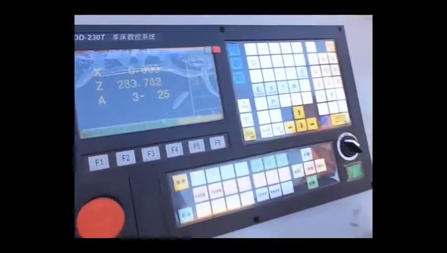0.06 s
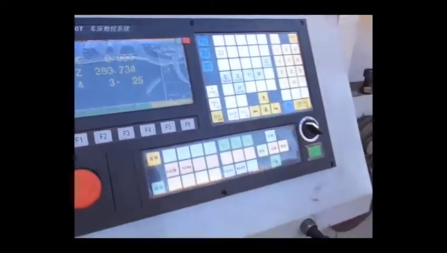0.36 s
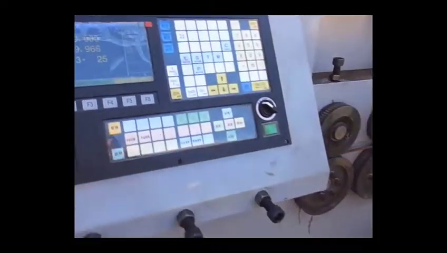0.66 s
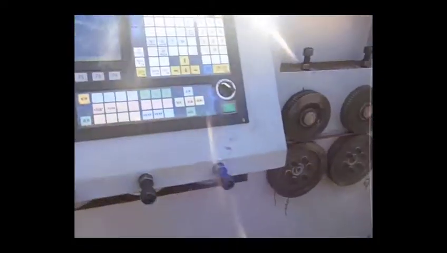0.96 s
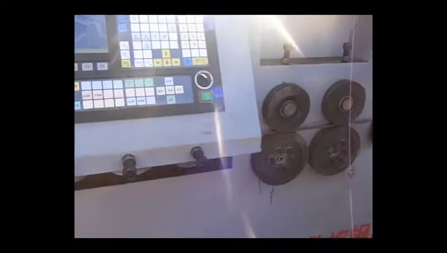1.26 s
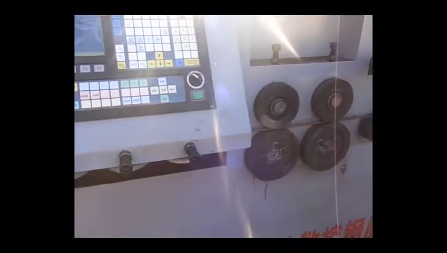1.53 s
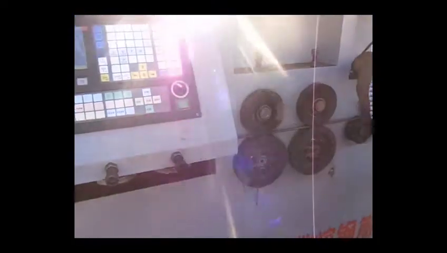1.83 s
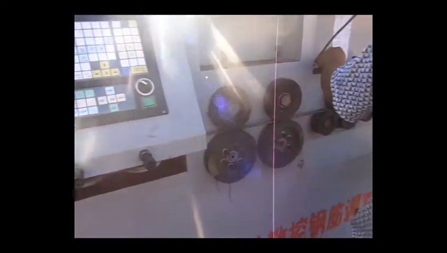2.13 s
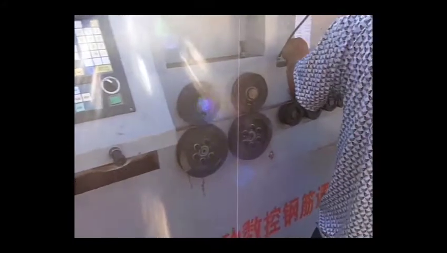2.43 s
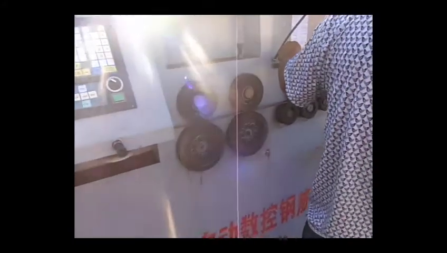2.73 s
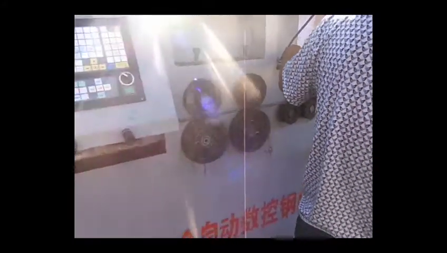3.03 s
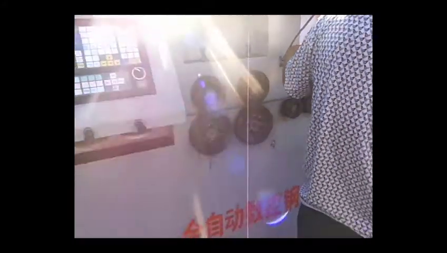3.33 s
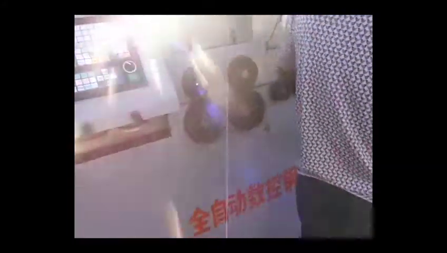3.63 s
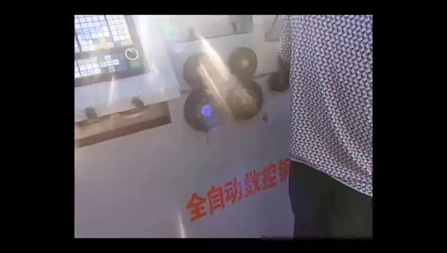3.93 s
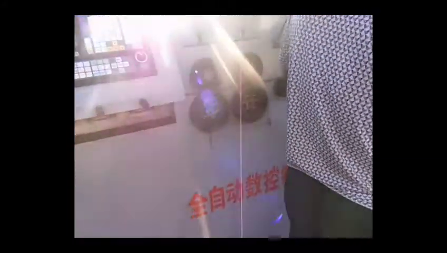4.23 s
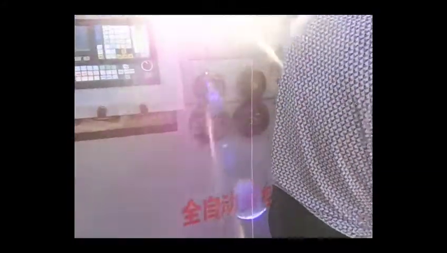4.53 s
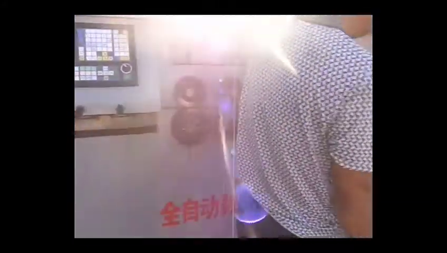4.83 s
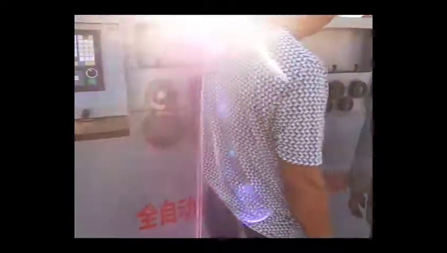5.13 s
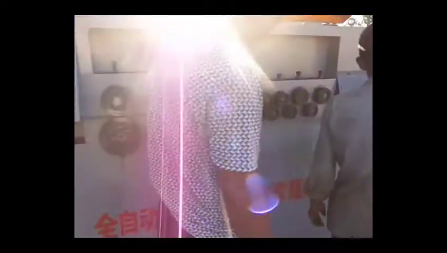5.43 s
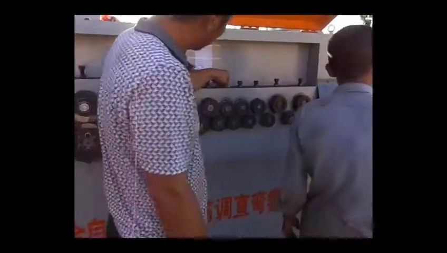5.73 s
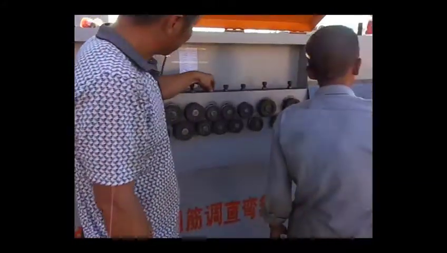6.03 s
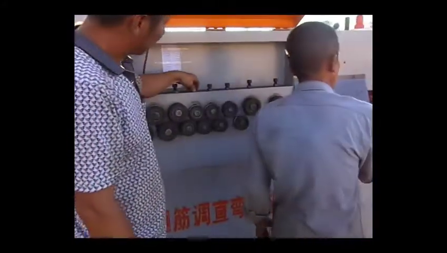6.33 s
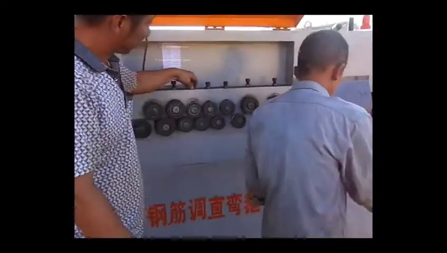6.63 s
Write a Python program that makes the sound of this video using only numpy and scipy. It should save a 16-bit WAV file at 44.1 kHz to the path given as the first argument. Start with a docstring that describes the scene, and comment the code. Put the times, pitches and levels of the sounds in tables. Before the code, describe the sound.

Close to the microphone, a machine feeds steel bar through rollers in five strokes, each with a low hum, cabinet rumble and scraping. The first strokes are heavier, with dull knocks and light ticks. Then loose steel takes over, clanging, pinging and rattling in quick irregular clusters. Near the end the bar briefly groans in the rollers and rings out. A soft outdoor wash lies underneath.

```python
"""You hear loose steel clanking and chattering over five surges of humming, rumbling and scraping.
It is a rebar straightening and bending machine, close by in an open yard. In each stroke the rollers
pull the bar: the drive hums, the cabinet rumbles and the ribbed steel scrapes through, snagging now
and then. The bar hits its steel guides so loudly that a limiter turns the peaks down."""
import sys
import numpy as np
from scipy import signal
from scipy.fft import rfft, irfft, next_fast_len
from scipy.io import wavfile
from scipy.ndimage import uniform_filter1d, minimum_filter1d, map_coordinates

SR = 44100
rng = np.random.default_rng(int(sys.argv[2]) if len(sys.argv) > 2 else 0)


def persist_wave(psi):
    """Save psi, clipped to +-1, as 16-bit WAV."""
    counts = np.round(np.clip(psi, -1, 1) * 32767).astype(np.int16)
    wavfile.write(sys.argv[1], SR, np.atleast_2d(counts).T)


N = 294588

# Tone colours. Each row: frequency in Hz, relative level in dB.
YARD_TONE = [(15, -69), (25, -43), (69, -19), (109, -18), (158, -15.5), (191, -10), (404, -9.5), (501, -13),
             (903, -32), (1030, -21.5), (1860, -19.5), (15000, -53)]
RUMBLE_TONE = [(25, -19.5), (60, -21), (110, -17), (170, -2), (260, -6.5), (380, 0.5), (480, -5.5),
               (700, -10), (1500, -65)]
ROLLING_TONE = [(250, -45), (420, -16), (520, -2), (740, 5.5), (980, 1), (1150, -1), (1600, -12),
                (2000, -7), (3000, -20), (8000, -31.5)]
CHATTER_TONE = [(940, -26.5), (1600, -10.5), (2790, -4), (3010, -0.5), (4190, 3.5), (4560, 0.5),
                (5320, 2.5), (6590, -11.5), (7500, -8), (9750, -15.5), (16500, -120)]
SCRAPE_TONE = [(1000, -123), (4000, -31), (6500, -6.5), (7600, -5), (8800, -3.5), (10500, 2), (13000, 6),
               (14500, 0.5), (16000, -37)]
BODY_TONE = [(60, -59), (250, -21), (600, -15), (1150, -8.5), (1700, 0), (2100, -3), (2600, -0.5),
             (4000, -27.5)]  # the low part of a blow
CLANG_TONE = [(1350, -42), (2300, -31), (3230, 8.5), (3730, -6.5), (4220, 9.5), (4840, 0), (5280, 4.5),
              (7200, -8), (9360, -24.5), (15800, -120)]  # its middle
EDGE_TONE = [(1000, -100), (5000, -54), (7000, -1.5), (7700, 0), (8800, -3), (9800, -0.5), (13000, 6),
             (14700, 2.5), (16000, -39)]  # its bright top
ECHO_TONE = [(100, -29.5), (1000, -32), (10000, -26.5)]
# Resonances, the pitches a part favours. Each row: pitch in Hz, width in Hz, relative level in dB.
HOUSING_MODES = [(410, 64, -2), (651, 86, -7.5), (1137, 12, -0.5), (1341, 24, 3), (1556, 180, -1.5),
                 (3650, 70, 7.5)]
BINDING_MODES = [(755, 36, -12.5), (1060, 59, -8), (1207, 15, -2)]
DIE_MODES = [(1600, 260, 11.5), (2345, 78, 21.5), (2860, 590, 17), (3840, 110, 8)]
FRAME_MODES = [(3980, 75, -5), (4880, 24, 2.5), (5460, 17, -17.5), (6010, 43, 1), (6360, 62, -11),
               (5920, 28, -3), (7180, 58, -24), (8640, 60, 1), (9200, 65, -1), (9740, 20, -10),
               (10450, 23, 5), (11770, 58, -7), (11600, 110, 1), (12100, 66, -22), (13300, 69, -37)]
# Ringing notes of the bar and guides. Each row: pitch in Hz, relative level in dB.
STEEL_MODES = [(2519, -28.5), (2869, -77), (3284, -43.5), (3569, -24), (3693, -31.5), (3919, -27),
               (4113, -44.5), (4608, -35), (4791, -42), (5146, -46), (5688, -40), (6089, -41), (6266, -44),
               (7407, -46), (7639, -66), (8118, -38), (8737, -23), (9211, -26), (9738, -27), (10212, -22.5),
               (10933, -27), (11644, -37), (12053, -57), (12425, -43), (13334, -42.5), (14260, -36)]
# The steel's short crash. Each row: frequency in Hz, seconds to fade by 60 dB (called t60).
STEEL_FADE = [(500, .12), (2000, .13), (5000, .115), (9000, .1), (15000, .09)]
# The drive speeds up a little, then slows. Each row: time in seconds, pitch in Hz.
DRIVE_PITCH = [(0.0, 77.5), (1.6, 79.2), (4.4, 77.24), (6.68, 75.5)]
# The tones in the hum. Each row: multiple of the drive's pitch, relative level in dB.
HUM_HARMONICS = [(1, -1), (2, -9), (3, -4.5), (4, -12), (5, -18.5), (8, -15), (10, -16), (12, -34.5)]
# The rollers pull. Each row: start and stop in seconds, then hum, rumble, rolling, rasp, chatter
# and scrape in dB.
FEED_STROKES = [(-0.2, 0.4, -46, -30, -31, -50, -45.5, -43),
                (1.27, 1.837, -34.5, -35.5, -31.5, -44, -53, -41.5),
                (2.723, 3.39, -45.5, -44, -37.5, -49, -61.5, -48),
                (4.159, 4.802, -49, -47, -36, -41.5, -28.5, -47),
                (6, 6.517, -48, -44, -40.5, -56, -48.5, -34)]
# The bar catches, then lets go. Each row: time in seconds, then hum, rumble, rolling and rasp in dB.
BAR_SNAGS = [(0.225, -27, -24, -17.5, -19.5), (1.42, -31.5, -49, -37, -57), (1.79, -26.5, -36, -56, -61),
             (3.09, -50, -42, -56, -37), (3.2, -57, -47, -36, -31.5), (4.33, -40.5, -60, -50, -29.5),
             (4.502, -61, -55, -40, -73), (6.09, -37.5, -32.5, -27, -42), (6.173, -60, -24.5, -23.5, -41),
             (6.47, -42.5, -51, -37.5, -54)]
# The bar rattles. Each row: start and stop in seconds, then rolling, rasp, chatter and scrape in dB.
BAR_RATTLES = [(2.086, 2.115, -53, -57, -48.5, -56), (2.877, 2.93, -48, -52, -46, -50),
               (3.228, 3.422, -67, -42.5, -60, -46.5), (3.66, 3.794, -47, -35.5, -29, -38),
               (3.873, 4.117, -53, -56, -37.5, -57), (4.277, 4.375, -65, -50, -22.5, -37),
               (4.925, 5.105, -53, -43, -38.5, -53), (5.134, 5.572, -43, -28.5, -24, -30),
               (5.356, 5.428, -68, -32, -13.5, -20.5), (5.903, 6.158, -30.5, -32, -38, -28.5),
               (6.567, 6.665, -46, -57, -39, -26.5)]
# The bar binds in the rollers. Each row: start and stop in seconds, level in dB.
BAR_GROANS = [(6.114, 6.19, -19.5), (6.318, 6.356, -29.5)]
# Dull thumps. Each row: time in seconds, level in dB, panel pitch in Hz.
CABINET_KNOCKS = [(0.209, -27, 228), (0.215, -30, 723), (0.425, -34, 321), (1.291, -35.5, 360),
                  (1.562, -32, 375), (2.74, -40.5, 640), (3.008, -40.5, 613), (6.03, -36, 343),
                  (6.168, -33.5, 434)]
# The bar grazes a guide. Each row: time in seconds, edge level in dB.
BAR_TICKS = [(0.388, -54.5), (0.594, -61.5), (1.6798, -47), (1.706, -44), (2.058, -53.5), (2.445, -66),
             (2.9717, -57), (3.36, -54), (3.5227, -52.5), (5.696, -55.5), (6.5258, -26), (6.555, -26.5),
             (6.608, -37), (6.647, -32.5)]
# The bar rings freely. Each row: start in seconds, pitch in Hz, level in dB, t60 in seconds.
BAR_PINGS = [(0.923, 5560, -37.5, 0.13), (0.924, 7085, -40, 0.11), (2.119, 5390, -17, 0.043),
             (3.645, 6085, -8.5, 0.18), (3.649, 3170, -28, 0.15), (5.097, 7640, -24, 0.57),
             (5.854, 3590, -13.5, 0.13), (5.932, 4530, -9, 0.056), (5.93, 9738, -8, 0.15),
             (6.556, 7510, -21, 0.91), (6.558, 6220, -30, 1), (6.557, 3894, -35, 0.54),
             (6.558, 5109, -30.5, 0.89)]
# The bar hits steel. Each row: time in seconds, number of contacts, clang in dB, then body and edge
# in dB relative to the clang.
BAR_CLANKS = [(0.1644, 1, -58, 23.5, -14), (0.2016, 1, -47.5, 5.5, 1.5), (0.9178, 2, -71, -3, -4.5),
              (1.29, 1, -55, 4, -36), (2.1184, 1, -50, -15, -36), (3.1007, 1, -52.5, 4, -11),
              (3.1917, 1, -48, -7, -9), (3.5535, 2, -41.5, -15.5, -21), (3.645, 3, -22, -16, -9),
              (3.8323, 1, -41, -15, -3.5), (3.8726, 1, -26, -21, -10), (3.925, 1, -38, -17.5, -24),
              (4.106, 1, -33, -8.5, -13.5), (4.3533, 1, -35.5, -29, -16), (4.3863, 1, -39, -34, -16),
              (4.4792, 1, -38.5, -9.5, -27), (4.4935, 1, -33, -17, -19), (4.507, 1, -30, -12, -22),
              (4.6148, 1, -37.5, -16, -17), (4.6918, 1, -40, -33.5, -13), (4.7302, 1, -40.5, -14, 0),
              (4.7642, 1, -36, -10.5, -12), (4.81, 1, -36.5, -13, -19), (5.014, 1, -52, -6, -5),
              (5.0957, 1, -24, -8, -8.5), (5.129, 1, -24.5, -9, -11), (5.237, 1, -30, -11, -8),
              (5.2742, 1, -38, -8.5, -1.5), (5.372, 1, -24.5, -13, -4), (5.3981, 1, -26.5, -17, 1),
              (5.5261, 1, -36.5, -4, -7.5), (5.8522, 1, -25.5, -11.5, -3.5), (5.902, 1, -22, -9.5, -2.5),
              (5.93, 1, -29.5, 7, 4)]

# Swell shapes. Each one: rise in dB per second, bulge at the middle in dB, fall in dB per second.
FEED_SHAPE, DRAG_SHAPE = (560, 5.1, 76.7), (450, 14.5, 67)
HUM_SHAPE, SCRAPE_SHAPE = (300, 1.3, 86), (530, 18, 50)
SNAG_SHAPE, SURGE_SHAPE = (184, 0, 640), (146, 0, 105)
RATTLE_SHAPE, GROAN_SHAPE = (150, 2, 260), (410, 1.6, 350)
HUM_LAG_S, SURGE_LAG_S = 0.117, 0.035  # the hum builds late in a stroke and after a snag
IDLE_HUM_DB, IDLE_ROLLING_DB, IDLE_CHATTER_DB = -67, -57.5, -67.5  # between strokes
BOUNCE_S, BOUNCE_LOSS_DB = .0335, 2.5
TICK_BODY_DB, TICK_CLANG_DB = -24.5, -15  # relative to the edge
TREBLE_LIMIT_HZ = 15200


def amp(db):
    """Turn decibels into a gain to multiply by."""
    return 10 ** (np.asarray(db) / 20)


def unit(x):
    """Scale a sound to an average power of 1."""
    return x / np.sqrt(np.mean(x ** 2) + 1e-20)


def along(points, hz):
    """Read between a table's rows on a logarithmic frequency scale."""
    row_hz, values = np.transpose(points)
    return np.interp(np.log(hz + 1), np.log(row_hz + 1), values)


def wobble(per_s):
    """A smooth curve through per_s random values a second."""
    return map_coordinates(rng.standard_normal(int(N * per_s / SR) + 4), [np.arange(N) * per_s / SR])


def filtered(x, response):
    """Multiply each frequency in a sound by response(hz)."""
    n = x.shape[-1]
    size = next_fast_len(n + 4096)
    return irfft(rfft(x, size) * response(np.fft.rfftfreq(size, 1 / SR)), size)[..., :n]


def coloured(x, tone):
    """Give a sound a tone colour."""
    return filtered(x, lambda hz: amp(along(tone, hz)))


def resonated(x, modes):
    """Keep mostly the sound near the given resonances."""
    return filtered(x, lambda hz: sum(
        (-1) ** k * amp(db) * 1j * hz * width / (pitch ** 2 - hz ** 2 + 1j * hz * width)
        for k, (pitch, width, db) in enumerate(modes)))


def boosted(x, modes, boost_db):
    """Keep the whole sound and add resonances on top."""
    return filtered(x, lambda hz: 1 + sum(
        amp(db + boost_db) / (1 + 2j * (hz - pitch) / width) for pitch, width, db in modes))


def rippled(x, depth_db, spacing_hz):
    """Put random peaks and dips in a sound's tone colour."""
    size = 2 ** 15
    positions = np.arange(size // 2 + 1) * SR / size / spacing_hz
    ripple_db = depth_db * map_coordinates(rng.standard_normal(2 ** 10), [positions], mode="mirror")
    # using only the first half makes the ringing follow the sound, never lead it
    cepstrum = irfft(np.log(amp(ripple_db)))[:size // 2]
    return irfft(rfft(x, size) * np.exp(rfft(2 * cepstrum, size)), size)[:len(x)]


def wandering(x, depth_db, life_s, width_hz):
    """The contact point travels along the bar, so resonances come and go."""
    hz, t, bands = signal.stft(x, SR, nperseg=1024)
    positions = np.meshgrid(hz / width_hz, t / life_s, indexing="ij")
    drift = map_coordinates(rng.standard_normal((2 ** 9, 2 ** 8)), positions, order=2, mode="mirror")
    return unit(signal.istft(bands * amp(depth_db * drift), nperseg=1024)[1][:N])


def tail(fade):
    """Half a second of noise in which each band fades at its own speed."""
    hz, t, bands = signal.stft(rng.standard_normal(SR // 2), SR, nperseg=256)
    x = signal.istft(bands * amp(-60 * t / along(fade, hz)[:, None]), SR, nperseg=256)[1][:SR // 2]
    return x / np.linalg.norm(x)


def burst(t, t60):
    """Noise that fades by 60 dB in t60 seconds."""
    return rng.standard_normal(len(t)) * amp(-60 * t / t60)


def grains(per_s, spread_db):
    """Tiny contacts of uneven size at random moments."""
    clicks = (rng.random(N) < per_s / SR) * rng.choice([-1, 1], N)
    return unit(clicks * amp(spread_db * rng.standard_normal(N)))


def add(track, start_s, sound):
    """Mix a sound into a track."""
    room_left = track[round(start_s * SR):]
    room_left[:len(sound)] += sound[:len(room_left)]


def swells(starts, stops, levels_db, shape):
    """A loudness curve of swells that each rise, reach their level midway and fall."""
    rise, bulge_db, fall = shape
    t = np.arange(0, N, 32)[:, None] / SR
    off_middle = np.clip(2 * (t - starts) / (stops - starts + 1e-9) - 1, -1, 1)
    db = levels_db - bulge_db * off_middle ** 2
    db -= rise * np.maximum(starts - t, 0) + fall * np.maximum(t - stops, 0)
    return np.interp(np.arange(N) / SR, t[:, 0], np.linalg.norm(amp(db), axis=1))


def yard():
    """The soft wash of a busy yard, drifting a little in level."""
    return amp(-54 + 1.2 * wobble(per_s=2.5)) * unit(coloured(rng.standard_normal(N), YARD_TONE))


def efforts():
    """Loudness curves for the machine: strokes, snags and rattles add in power (hypot)."""
    start, stop, hum_db, rumble_db, rolling_db, rasp_db, chatter_db, scrape_db = np.transpose(
        FEED_STROKES)
    drone = np.hypot(amp(IDLE_HUM_DB), swells(start + HUM_LAG_S, stop, hum_db, HUM_SHAPE))
    rumble, rolling = (swells(start, stop, db, FEED_SHAPE) for db in (rumble_db, rolling_db))
    rasp, chatter = (swells(start, stop, db, DRAG_SHAPE) for db in (rasp_db, chatter_db))
    scrape = swells(start, stop, scrape_db, SCRAPE_SHAPE)

    at, surge_db, *snag_db = np.transpose(BAR_SNAGS)
    drone = np.hypot(drone, swells(at + SURGE_LAG_S, at + SURGE_LAG_S, surge_db, SURGE_SHAPE))
    snags = [swells(at, at, db, SNAG_SHAPE) for db in snag_db]
    rumble, rolling, rasp = np.hypot([rumble, rolling, rasp], snags)

    start, stop, *rattle_db = np.transpose(BAR_RATTLES)
    rattles = [swells(start, stop, db, RATTLE_SHAPE) for db in rattle_db]
    rolling, rasp, chatter, scrape = np.hypot([rolling, rasp, chatter, scrape], rattles)

    flutter = amp(2 * wobble(per_s=35))  # the whipping bar presses unevenly on its guides
    rolling = np.hypot(rolling, amp(IDLE_ROLLING_DB))
    chatter = np.hypot(flutter * chatter, amp(IDLE_CHATTER_DB))
    return drone, rumble, rolling, rasp, chatter, flutter * scrape


def hum(turns, gain):
    """The drive's low tone and its overtones, each a little unsteady."""
    out = np.zeros(N)
    for multiple, db in HUM_HARMONICS:
        waver_db = 1.8 * wobble(per_s=14)
        out += amp(db + waver_db) * np.sin(2 * np.pi * (multiple * turns + rng.random()))
    return gain * out


def rollers(turns, rumble_gain, rolling_gain):
    """The bar's ribs patter through the rollers, which shake in step with the drive."""
    shake = 1 + 0.093 * np.cos(2 * np.pi * turns)
    rumble = coloured(shake * grains(per_s=3000, spread_db=5), RUMBLE_TONE)
    rolling = coloured(shake * grains(per_s=4000, spread_db=1), ROLLING_TONE)
    rolling = boosted(rolling, HOUSING_MODES, boost_db=3.5)
    rumble = wandering(rumble, depth_db=2.5, life_s=.08, width_hz=60)
    rolling = wandering(rolling, depth_db=4, life_s=.11, width_hz=80)
    return rumble_gain * rumble + rolling_gain * rolling


def knocks():
    """Slack in the feed thumps the cabinet panels."""
    out, t = np.zeros(N), np.arange(SR // 8) / SR
    for start, db, hz in CABINET_KNOCKS:
        thump = resonated(burst(t, t60=.36), [(hz, 60, 0), (1.56 * hz, 120, -9)])
        add(out, start, amp(db) * unit(thump))
    return out


def rubbing(gain, modes, slips):
    """The bar sticks and slips, setting a few resonances going."""
    return gain * wandering(resonated(slips, modes), depth_db=2.5, life_s=.08, width_hz=75)


def steelwork(ring_db, ring_t60):
    """How the steel answers one tap: a short crash coloured by the frame, and notes that ring on."""
    t = np.arange(SR // 2) / SR
    hz, db = np.transpose(STEEL_MODES)[:, :, None]
    notes = amp(db) * np.sin(2 * np.pi * (hz * t + rng.random(hz.shape)))
    ring = notes.sum(axis=0) * amp(-60 * t / ring_t60)
    crash = rippled(tail(STEEL_FADE), depth_db=1.5, spacing_hz=110)
    crash = boosted(crash, FRAME_MODES, boost_db=3)
    return unit(crash) + amp(ring_db) * unit(ring)


def contacts():
    """Every tick, blow and bounce. Each row: time in seconds, then body, clang and edge in dB."""
    rows = [(start, db + TICK_BODY_DB, db + TICK_CLANG_DB, db) for start, db in BAR_TICKS]
    for start, count, first_db, body_db, edge_db in BAR_CLANKS:
        for bounce in range(round(count)):
            db = first_db - bounce * BOUNCE_LOSS_DB
            rows.append((start + bounce * BOUNCE_S, db + body_db, db, db + edge_db))
    return rows


def lift_off(dip_db, flight_s):
    """The bar lifts off its guides just before each blow, so the sliding sound dips."""
    t, lift = np.arange(N) / SR, np.zeros(N)
    for start, *_ in contacts():
        lift = np.maximum(lift, 1 - np.abs(start - t - flight_s / 4) / flight_s)
    return amp(dip_db * lift)


def sliding(steel, chatter_gain, scrape_gain):
    """Swarms of small contacts: coarse chatter rings the steel, fine scraping stays near the contact."""
    chatter = signal.fftconvolve(grains(per_s=800, spread_db=3), steel)[:N]
    scrape = signal.fftconvolve(grains(per_s=740, spread_db=3.5), tail(STEEL_FADE))[:N]
    chatter = wandering(coloured(chatter, CHATTER_TONE), depth_db=5, life_s=.09, width_hz=100)
    scrape = wandering(coloured(scrape, SCRAPE_TONE), depth_db=5, life_s=.12, width_hz=170)
    return lift_off(dip_db=-7, flight_s=.018) * (chatter_gain * chatter + scrape_gain * scrape)


def pings():
    """A blow leaves the bar free to ring: two close notes, set by its free length, beat together."""
    out, t = np.zeros(N), np.arange(SR // 2) / SR
    for start, hz, db, t60 in BAR_PINGS:
        partner_hz = hz * (1 + .01 * rng.standard_normal())
        pair = np.sin(2 * np.pi * hz * t) + .6 * np.sin(2 * np.pi * partner_hz * t)
        rise_s = .0007 * amp(-db / 2)  # faint notes start softly
        attack = 1 - np.exp(-t / rise_s)
        add(out, start, amp(db - 60 * t / t60) * attack * pair)
    return out


def clanks(steel, buzz_db):
    """Each blow grinds briefly on the steel; its force and place set the mix of body, clang and edge."""
    out, t = np.zeros(N), np.arange(SR // 2) / SR
    lead_samples = 256
    for start, *parts_db in contacts():
        ring = signal.fftconvolve(burst(t, t60=.018), steel)[:len(t)]
        buzz = burst(t, t60=.21)  # the parts buzz against each other after the blow
        rise_s = .00026 * amp(-max(parts_db) / 2)  # light touches build up more slowly
        attack = 1 - np.exp(-t / rise_s)
        blow = attack * (unit(ring) + amp(buzz_db) * unit(buzz))
        blow = rippled(blow, depth_db=4.5, spacing_hz=110)  # each spot has its own resonances
        blow = np.pad(blow, (lead_samples, 0))
        for db, tone in zip(parts_db, (BODY_TONE, CLANG_TONE, EDGE_TONE)):
            add(out, start - lead_samples / SR, amp(db) * unit(coloured(blow, tone)))
    return out


def scene():
    """The machine straight ahead, with faint scattered echoes from either side."""
    pitch_hz = np.interp(np.arange(N) / SR, *np.transpose(DRIVE_PITCH))
    turns = np.cumsum(pitch_hz * (1 + 0.00796 * wobble(per_s=20))) / SR
    drone, rumble, rolling, rasp, chatter, scrape = efforts()
    groan = swells(*np.transpose(BAR_GROANS), GROAN_SHAPE)
    steel = steelwork(ring_db=-9, ring_t60=.22)
    drive = hum(turns, drone) + rollers(turns, rumble, rolling) + knocks()
    friction = rubbing(groan, BINDING_MODES, grains(per_s=2300, spread_db=0.5))
    friction += rubbing(rasp, DIE_MODES, grains(per_s=1800, spread_db=3.5))
    blows = clanks(steel, buzz_db=-20.5) + pings()
    direct = drive + friction + blows + sliding(steel, chatter, scrape) + yard()
    echo = signal.fftconvolve(direct, tail([(200, 0.0093), (10000, 0.011)]))[:N]
    side = coloured(echo, ECHO_TONE)
    return np.array([direct + side, direct - side])


def record(dry):
    """A fast limiter turns the loudest peaks down to full scale, then the highest treble is cut."""
    needed_gain = 1 / np.maximum(np.abs(dry).max(axis=0), 1)
    gain = uniform_filter1d(minimum_filter1d(needed_gain, size=33), size=33)
    return filtered(dry * gain, lambda hz: 1 / (1 + (hz / TREBLE_LIMIT_HZ) ** 160))


dry = scene()
out = record(dry)
persist_wave(out)
```